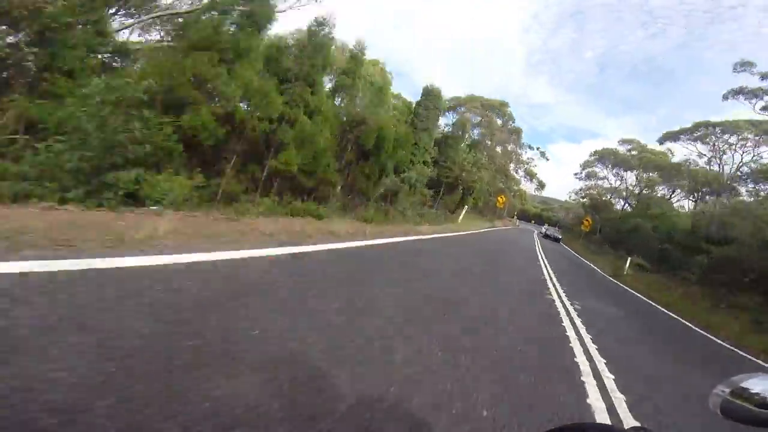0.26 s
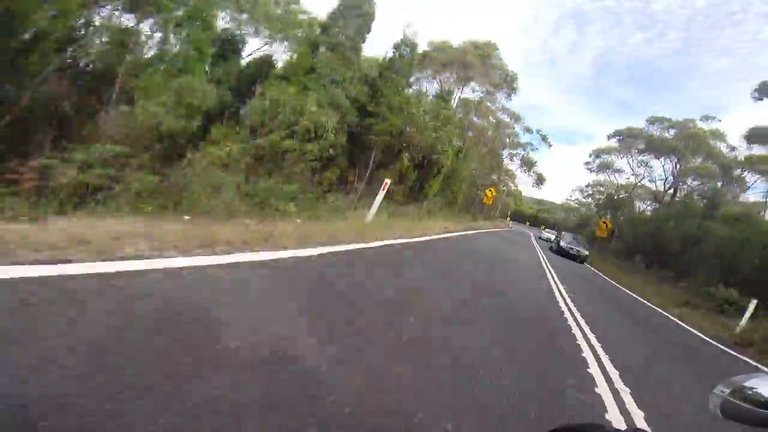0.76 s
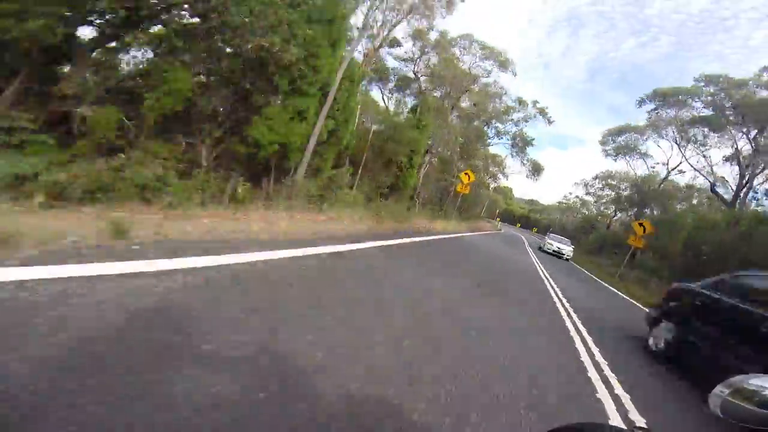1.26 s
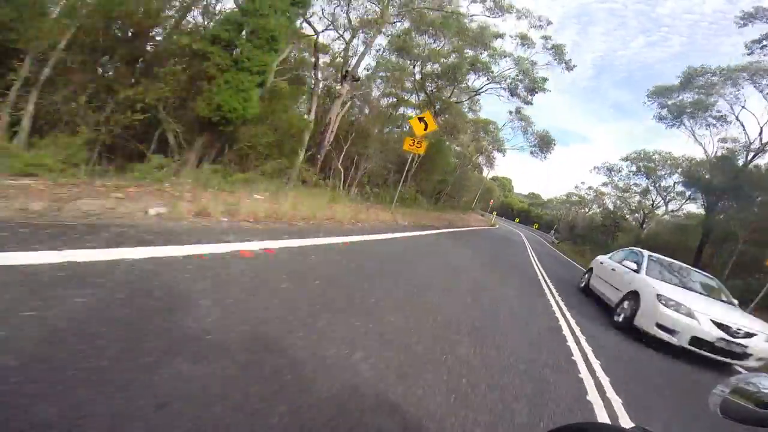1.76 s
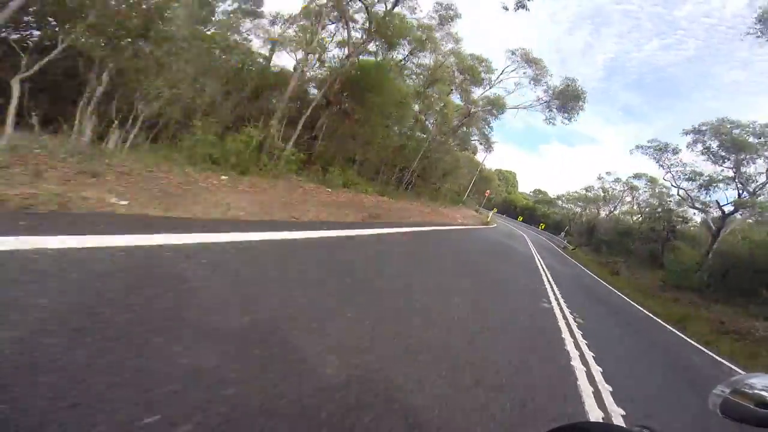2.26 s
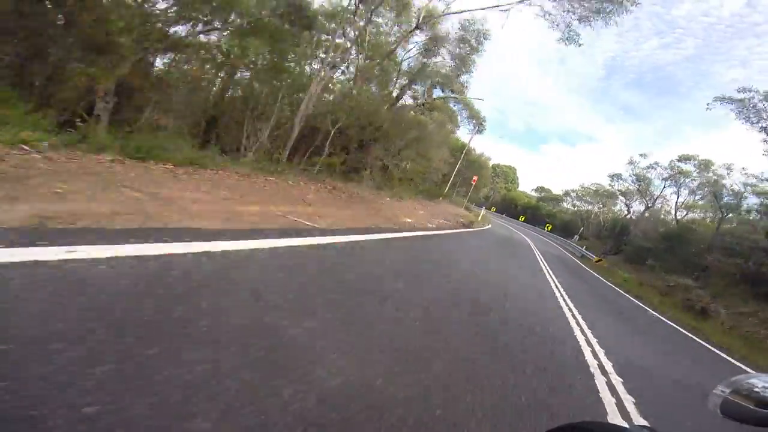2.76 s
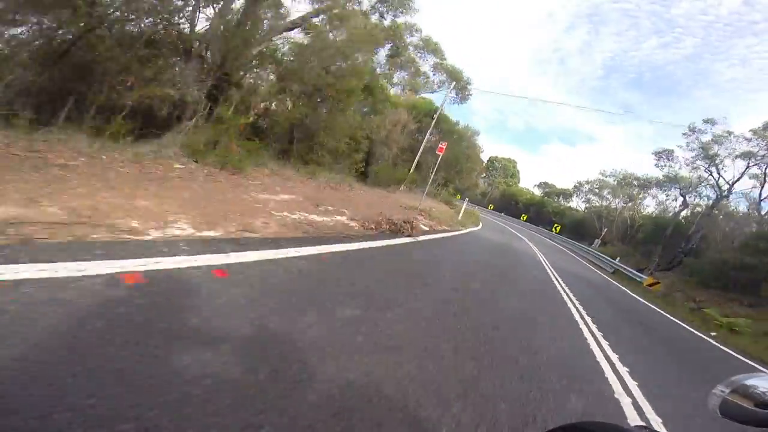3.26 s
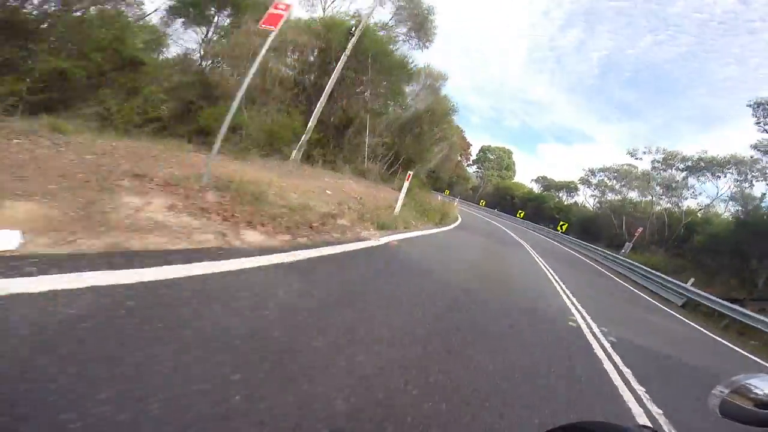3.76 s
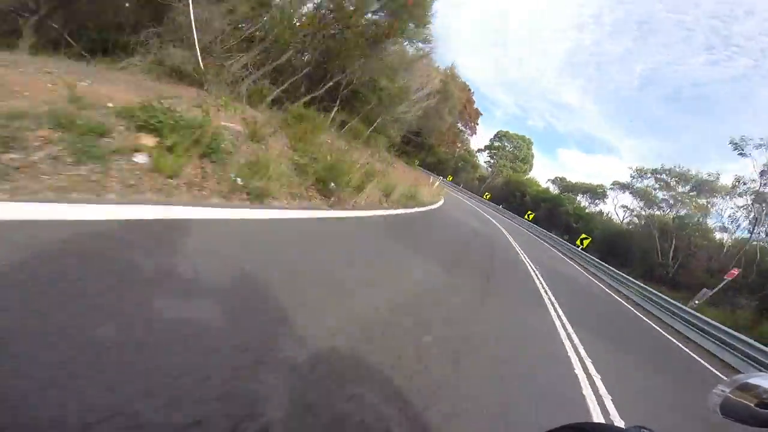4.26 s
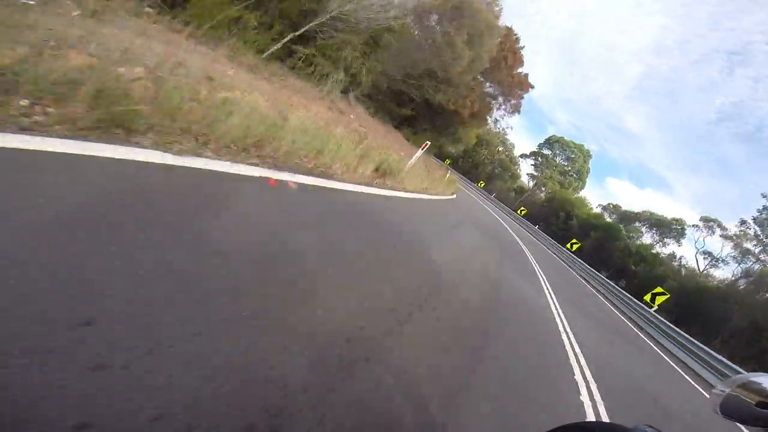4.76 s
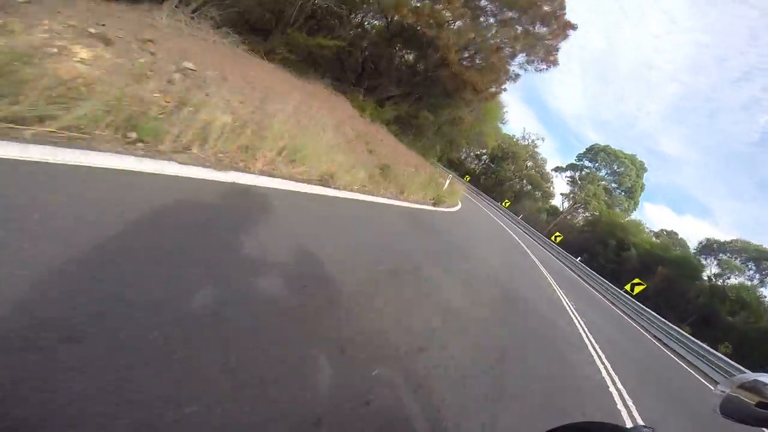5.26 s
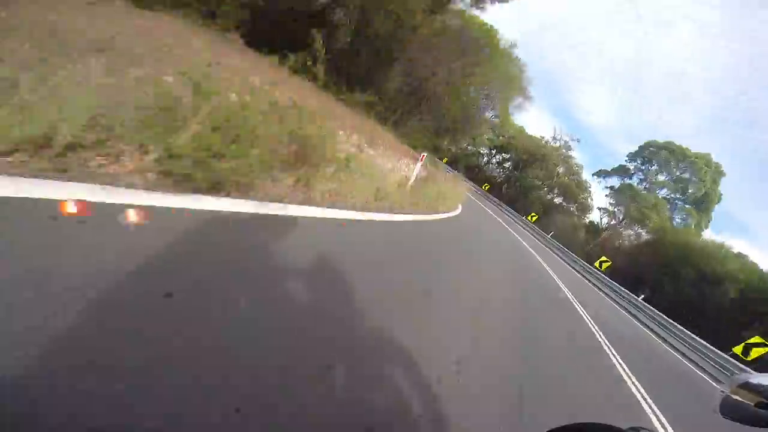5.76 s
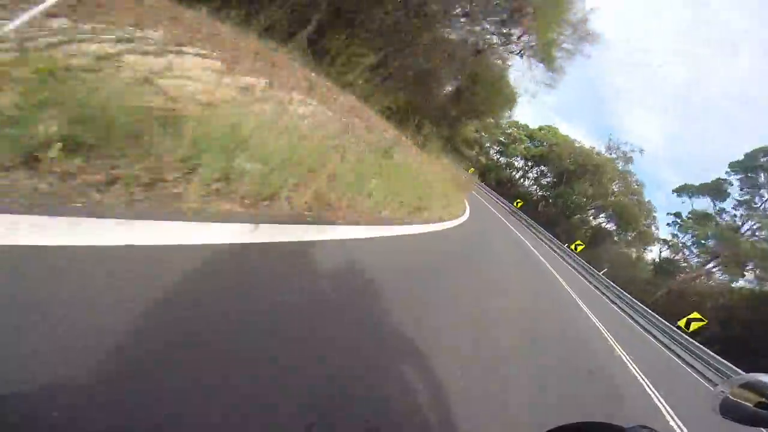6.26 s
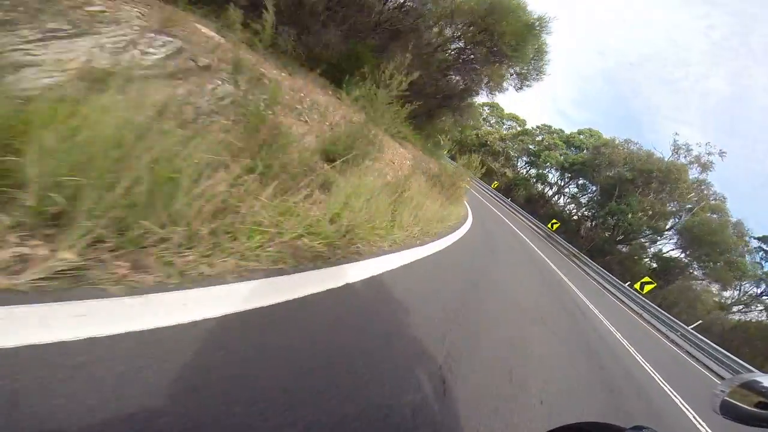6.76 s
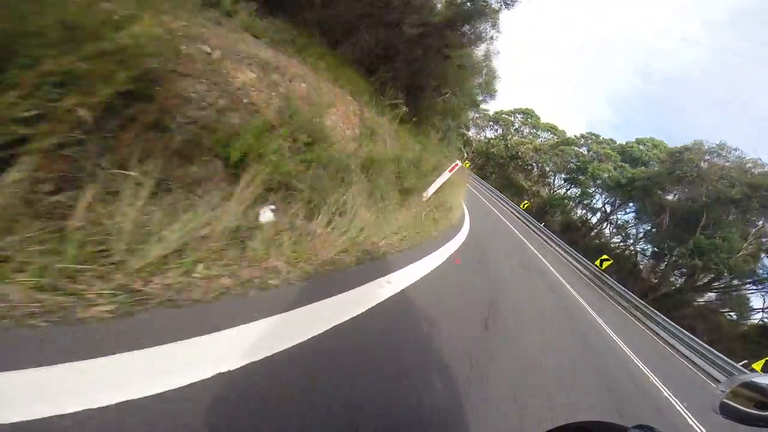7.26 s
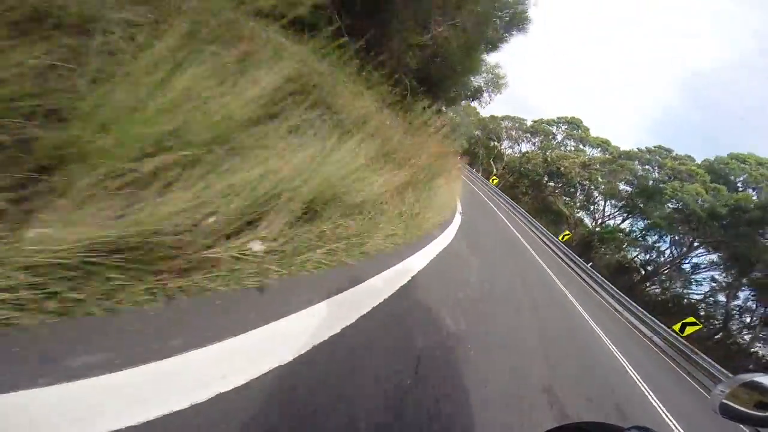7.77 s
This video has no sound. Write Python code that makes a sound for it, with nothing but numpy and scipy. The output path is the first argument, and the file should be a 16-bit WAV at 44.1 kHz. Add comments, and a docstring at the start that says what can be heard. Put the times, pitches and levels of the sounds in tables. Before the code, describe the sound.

From a camera mounted on a moving motorcycle comes a deep, uneven exhaust beat with light metallic clatter and gusty wind on the microphone. The engine pulls briefly, then slows for a bend as a gear whine slides downward. Small knocks from the road rattle the camera housing, mostly in the first half. The engine takes up load again at low revs, and the whine drops out and returns once more.

```python
"""A V-twin motorcycle on a country road, close up, from the microphone of a camera on the bike.
It pulls first: the exhaust beats over gear whine and valve clatter, wind rumbles round the microphone,
and road bumps and engine shake make the camera housing tick. At 1.5 s the rider rolls off into a bend;
the revs sink and the gearbox sings. From 5 s the throttle is open again and the bike holds low revs,
the gearbox dropping out and then singing once more."""
import sys
import numpy as np
from scipy import signal
from scipy.fft import rfft, irfft, next_fast_len
from scipy.io import wavfile

SR = 44100
rng = np.random.default_rng(int(sys.argv[2]) if len(sys.argv) > 2 else 0)


def generate_wav(sig):
    """Save sig (samples, or channels by samples) to the path in sys.argv[1] as 16-bit PCM at SR."""
    pcm = np.round(np.clip(np.atleast_2d(sig).T, -1, 1) * 32767).astype(np.int16)
    wavfile.write(sys.argv[1], SR, pcm)


N = 353152

# ringing of the engine cases: frequency_hz, gain_db
CASE_RING = [(400, -19), (600, -12), (710, 1.5), (830, -1.5), (950, -2), (1080, -11.5), (1230, -5.5),
             (1410, 0.5), (1580, 1.5), (1700, -15.5), (2100, -33.5), (3000, -58.5)]
# resonances that the gearbox tone slides through: frequency_hz, gain_db
GEARBOX_RESPONSE = [(798, -0.5), (816, -12.5), (850, -10.5), (915, -8), (945, -3), (975, -6), (1025, -18.5),
                    (1125, -8)]
# bright ringing of the camera housing: frequency_hz, width_hz, gain_db
HOUSING_MODES = [(2610, 680, 0.5), (3780, 440, -0.5), (4500, 530, -2), (6030, 620, -8), (6700, 610, -8),
                 (10600, 1700, -14.5)]


def from_db(db):
    """Decibels to gain."""
    return 10 ** (np.asarray(db) / 20)


def rms_one(x):
    """Scale to unit rms."""
    return x / np.sqrt(np.mean(x ** 2) + 1e-20)


def in_time(rows):
    """The columns of a curve at every sample."""
    time_s, *columns = np.transpose(rows)
    return [np.interp(np.arange(N) / SR, time_s, column) for column in columns]


def gain_at(spectrum, hz):
    """Read a dB spectrum on a log-frequency axis, as a gain."""
    points_hz, points_db = np.transpose(spectrum)
    return from_db(np.interp(np.log(hz + 1e-9), np.log(points_hz), points_db))


def colour(x, spectrum):
    """Give a steady sound a spectrum that ends at its last point; rms 1."""
    size = next_fast_len(N)
    hz = np.fft.rfftfreq(size, 1 / SR)
    gain = gain_at(spectrum, hz) * (hz < spectrum[-1][0])
    return rms_one(irfft(rfft(x, size) * gain, size)[:N])


def drift(rate, hop=40, settle=2000):
    """Smooth chance with about `rate` swings a second; spread 1."""
    pole = np.exp(-2 * np.pi * hop * rate / SR)
    noise = rng.standard_normal(N // hop + settle + 2)
    slow = signal.lfilter([1], [1, -2 * pole, pole * pole], noise)[settle:]
    return np.interp(np.arange(N) / hop, np.arange(len(slow)), rms_one(slow))


def resonate(x, hz, width_hz):
    """A two-pole resonance with gain 1 on top."""
    r = np.exp(-np.pi * width_hz / SR)
    feedback = [1, -2 * r * np.cos(2 * np.pi * hz / SR), r * r]
    return signal.lfilter(np.array([1, 0, -1]) * (1 - r * r) / 2, feedback, x + 1e-18)


def with_revs(cycle_hz, cruise_db, doubling_db, cruise_hz=30):
    """Gain of a noise that grows by doubling_db with each doubling of engine speed."""
    return from_db(cruise_db + doubling_db * np.log2(cycle_hz / cruise_hz))


def wind(cycle_hz, gust_db=3.5, buffet_hz=173.3):
    """Air round the microphone: a gusty rumble, and a narrow buffeting that fades as the bike slows."""
    # wind rumble: frequency_hz, level_db
    spectrum = [(15, -16), (35, -9), (48, -7.5), (74, 4.5), (98, -0.5), (130, -3), (190, -6.5),
                (220, -17.5), (300, -10), (400, -19), (520, -24), (640, -35.5), (1000, -70)]
    rumble = with_revs(cycle_hz, cruise_db=-26.5, doubling_db=9) * from_db(gust_db * drift(14))
    rumble *= colour(rng.standard_normal(N), spectrum)
    buffet = resonate(rng.standard_normal(N), buffet_hz, width_hz=30)
    buffet = rms_one(resonate(buffet, buffet_hz, width_hz=30))
    return rumble + with_revs(cycle_hz, cruise_db=-35, doubling_db=27) * buffet


def housing(clicks, modes, chatter, chatter_s, soft_hz=7000):
    """Soft contacts chatter and ring the camera housing; the peak equals the largest click."""
    fading = signal.lfilter([1], [1, -np.exp(-1 / (chatter_s * SR))], clicks + 1e-18)
    contact = clicks + chatter * fading * rng.standard_normal(N)
    contact = signal.sosfilt(signal.butter(2, soft_hz, fs=SR, output="sos"), contact)
    ring = sum((-1) ** k * from_db(db) * resonate(contact, hz, width_hz)
               for k, (hz, width_hz, db) in enumerate(modes))
    return ring * clicks.max() / np.abs(ring).max()


def housing_rattle(shake, slip_db=-11, slip_share=0.75, rebound_s=0.0027, rebound_db=-3.5):
    """The deepest swings of the shaking can make the housing slip with a faint double tick."""
    swing = -shake / from_db(slip_db)   # the housing holds until the swing passes 1
    troughs = signal.find_peaks(swing, height=1, distance=SR // 150)[0]
    depth = swing[troughs]
    luck, force, bounce = rng.random((N, 3))[troughs].T
    slips = luck < slip_share * (depth - 1)
    size = slips * from_db(-57 + 16 * force + 2 * depth)
    ticks = np.zeros(N)
    ticks[troughs] = size
    rebounds = np.minimum(troughs + int(rebound_s * SR), N - 1)
    ticks[rebounds] += size * from_db(rebound_db) * bounce ** 2
    return housing(ticks, HOUSING_MODES, chatter=0.26, chatter_s=0.00022)


def road_knocks(bright_db=3, dull_db=7.5):
    """Bumps in the road knock the housing, each with its own mix of dull and bright ringing."""
    # knocks, before the bright and dull gains: start_s, level_db, extra_dull_db
    bumps = [(0.0513, -42.5, 11), (0.087, -43, 6), (0.3309, -34.5, 8.5), (0.4299, -39, 10),
             (0.5501, -37, 10), (0.5751, -34, 8.5), (0.6878, -41, -3), (0.8729, -39, 12),
             (1.0301, -42.5, 10), (1.3028, -40.5, 5), (1.5404, -43.5, 13), (1.5913, -36, 7),
             (1.6426, -33.5, 8.5), (2.353, -39, -0.5), (2.5091, -30.5, 10), (2.5456, -40, 11),
             (2.6259, -39, 9.5), (2.6834, -43.5, 14), (2.725, -45, 15), (2.7671, -44, 2),
             (2.8898, -36.5, 7.5), (3.7925, -39.5, 11.5), (3.9792, -45, 12), (4.0419, -41, 6),
             (4.0716, -41, 10), (4.7561, -44.5, 8), (5.4796, -43, 0), (5.95, -44, 6), (6.8645, -40.5, -1),
             (7.6308, -41, -10)]
    # dull ringing of the housing: frequency_hz, width_hz, gain_db
    dull_modes = [(1740, 440, -2), (2270, 520, -5.5)]
    bright, dull = np.zeros(N), np.zeros(N)
    for start_s, level_db, extra_dull_db in bumps:
        bright[int(start_s * SR)] = from_db(level_db + bright_db)
        dull[int(start_s * SR)] = from_db(level_db + extra_dull_db + dull_db)
    bright_ring = housing(bright, HOUSING_MODES, chatter=0.47, chatter_s=0.0021, soft_hz=5500)
    return bright_ring + housing(dull, dull_modes, chatter=0.91, chatter_s=0.002)


def cam_drone(cycles, cycle_hz, flutter=0.24):
    """The cam drive hums on whole multiples of the crank speed, loudest where the cases ring."""
    # cam tones: multiple_of_cycle_rate, level_over_case_db
    tones = [(32, 1), (36, -0.5), (38, 0), (40, 0.5), (64, 0.5), (68, 0.5), (72, -1.5)]
    out = np.zeros(N)
    for order, db in tones:
        level = from_db(db) * gain_at(CASE_RING, order * cycle_hz) * (1 + flutter * drift(0.69))
        out += level * np.sin(2 * np.pi * (order * cycles + rng.random()))
    return np.sqrt(2) * out


def valve_train(cycles, repeat, bite, steps=1024):
    """Contacts bunch at set places in the cycle; the share `repeat` recurs exactly, the rest is chance."""
    orders = np.arange(steps // 2 + 1)
    pattern = irfft(np.exp(2j * np.pi * rng.random(len(orders))) * (orders > 13) * (orders < 100))
    locked = np.interp(cycles % 1 * steps, np.arange(steps), rms_one(pattern))
    locked *= np.sqrt(1 / 8)   # same power per Hz as the noise
    angle = 2 * np.pi * cycles
    bunching = np.exp(bite * (0.57 * np.cos(angle) + np.cos(2 * angle) + np.cos(3 * angle)))
    return bunching * (np.sqrt(repeat) * locked + np.sqrt(1 - repeat) * rng.standard_normal(N))


def engine_metal(cycles, cycle_hz, throttle, rasp_db=2.6, clatter_rasp_db=3, waver_db=1.16):
    """Valves and chains shake the cases: ring, drone, dry clatter and hiss rise with revs and load."""
    # dry valve clatter: frequency_hz, level_db
    clatter_spectrum = [(900, -29.5), (1700, 1.5), (1900, 1.5), (2250, -6), (2480, -7), (2620, -5.5),
                        (2760, -12), (2950, -19.5), (3600, -40)]
    # faint metallic hiss: frequency_hz, level_db
    hiss_spectrum = [(2000, -19), (3000, -6), (3350, -2), (3570, 2), (3950, -7), (4520, -1), (5400, -6),
                     (5950, -0.5), (6400, -10), (7100, -0.5), (7650, -18), (9650, -15), (10600, -33),
                     (15000, -57.5)]
    song = gearbox_song() * gain_at(GEARBOX_RESPONSE, GEARBOX_MESH * cycle_hz)
    rasp = (song / song.max()) ** 2   # a gearbox in resonance makes everything around it rasp
    ring = with_revs(cycle_hz, cruise_db=-36.5, doubling_db=9)
    ring *= colour(valve_train(cycles, repeat=0.2, bite=0.15), CASE_RING)
    drone = with_revs(cycle_hz, cruise_db=-47.5, doubling_db=4.4) * cam_drone(cycles, cycle_hz)
    clatter = with_revs(cycle_hz, cruise_db=-51.5, doubling_db=17.2) * from_db(clatter_rasp_db * rasp)
    clatter *= colour(valve_train(cycles, repeat=0.089, bite=0.21), clatter_spectrum)
    hiss = with_revs(cycle_hz, cruise_db=-66.5, doubling_db=9.5)
    hiss *= colour(valve_train(cycles, repeat=0, bite=0.14), hiss_spectrum)
    load = throttle - 0.5
    metal = from_db(load) * (ring + clatter) + from_db(1.5 * load) * drone + from_db(2.5 * load) * hiss
    return from_db(rasp_db * rasp + waver_db * drift(17)) * metal


def gearbox_song(attack_s=0.04, release_s=0.031):
    """Gain of the gearbox mesh: each stretch sets in quickly, holds and lets go."""
    # stretches in which the gearbox sings: start_s, end_s, gain_db
    stretches = [(1.64, 5.35, -31), (6.21, 7.64, -27)]
    t = np.arange(N) / SR
    return sum(from_db(db) * np.interp(t, [start, start + attack_s, end, end + release_s], [0, 1, 1, 0])
               for start, end, db in stretches)


def gear_whine(cycles, cycle_hz, flutter=0.17, crank_sway=0.047, wobble_rad=0.26, waver_db=0.76):
    """Gearbox and primary drive teeth whine, swayed by the crank and swelling at case resonances."""
    # resonances of the primary drive case: frequency_hz, gain_db
    primary_response = [(970, -20.5), (1005, -32), (1070, -19), (1130, -20), (1200, -11), (1260, -11.5),
                        (1290, -4.5), (1405, 0.5)]
    # how the cases radiate mesh overtones: frequency_hz, gain_db
    radiation = [(1600, -19.5), (1750, -34), (2000, -27.5), (2280, -25), (2400, -36), (2600, -30.5),
                 (2850, -48), (4300, -56.5), (4520, -39.5), (4750, -55.5), (6000, -62.5)]
    meshes = [(GEARBOX_MESH, gearbox_song(), GEARBOX_RESPONSE, 0),
              (PRIMARY_MESH, from_db(-27.5), primary_response, -9)]
    crank = 4 * np.pi * cycles   # two turns a cycle
    sway = crank_sway * (np.cos(crank) + np.cos(2 * crank))
    out = np.zeros(N)
    for teeth, gain, case, overtones_db in meshes:
        mesh_hz = teeth * cycle_hz
        phase = 2 * np.pi * teeth * cycles + wobble_rad * drift(25)
        level = gain * from_db(waver_db * drift(8.2)) * (1 + flutter * drift(23) + sway)
        tone = gain_at(case, mesh_hz) * np.sin(phase)
        overtones = sum(gain_at(radiation, k * mesh_hz) * np.sin(k * phase) for k in range(2, 6))
        out += level * (tone + from_db(overtones_db) * overtones)
    return np.sqrt(2) * out


def exhaust(cycles, cycle_hz, throttle, lift_db, second_at_cycle=0.42, second_size=0.7, flutter=0.14):
    """Two unevenly spaced firings a cycle; their orders slide through the pipe's resonances."""
    # engine orders: multiple_of_cycle_rate, throttle_shut_db, throttle_open_db
    orders = [(1, 19, 17), (2, 18, 14), (3, -9, 15), (4, 15.5, 11.5), (5, 1, 0.5), (6, 11, -1),
              (7, -8.5, -1), (8, 7.5, 3.5), (9, 3.5, -1.5), (10, -6, 3.0), (11, -3, 0), (12, 5.5, -12.5),
              (13, -0.3, 1), (14, 3, 1), (15, -9, -3.5), (16, -8, -1), (17, -2, 0.5), (18, -3, -4.5),
              (19, -14.5, -2), (20, -15.5, -0.5), (21, -3, -4)]
    # response of exhaust and frame: frequency_hz, gain_db
    pipe = [(30, -62), (58, -45.5), (66, -43), (70, -33.5), (82, -35), (100, -24.5), (118, -24.0),
            (150, -37.5), (175, -34), (215, -40.5), (270, -29), (315, -28.5), (380, -39.5), (520, -56.5),
            (620, -49.5), (705, -37.5), (800, -45.5)]
    bark_db = lift_db + 0.55 * drift(16)   # sharper and softer burns
    out = np.zeros(N)
    for order, shut_db, open_db in orders:
        bark_share = np.clip(order / 4 - 1, 0, 1)   # only above the fourth order
        level = from_db(shut_db + throttle * (open_db - shut_db) + bark_share * bark_db)
        level *= gain_at(pipe, order * cycle_hz) * (1 + flutter * drift(14))
        firings = 1 + second_size * np.exp(-2j * np.pi * order * second_at_cycle)
        lag_turns = 1.2 * np.log(order) ** 2   # the pipe smears each pulse
        out -= level * np.cos(2 * np.pi * (order * cycles - lag_turns) + np.angle(firings))
    return np.sqrt(2) * out * (1 + flutter * drift(30))   # no two burns are alike


def scene():
    """The ride at the microphone; everything on the engine is locked to one crank."""
    # engine speed in four-stroke cycles: time_s, cycle_hz
    revs = [(0.0, 39.12), (0.5, 39.33), (0.62, 40.03), (1.3, 41.48), (1.53, 40.59), (1.62, 37.74),
            (1.7, 39.88), (1.85, 40.36), (2.0, 39.5), (2.3, 38.99), (2.5, 37.61), (3.5, 33.66),
            (3.75, 33.06), (4.0, 31.61), (4.5, 30.52), (5.0, 29.64), (6.0, 29.86), (6.25, 29.42),
            (6.5, 29.65), (7.0, 28.72), (7.5, 28.37), (8.0, 29.03)]
    # the rider's throttle and the lift of the higher orders: time_s, opening_0_to_1, lift_db
    twist_grip = [(0.0, 0.63, 2.5), (0.55, 0.74, 3), (0.75, 0.84, -5.5), (1.4, 0.85, -2.5), (1.6, 0.3, 1.7),
                  (2.0, 0.28, 2.5), (2.6, 0.13, 1.5), (3.4, 0.0, -1), (4.2, 0.0, -4), (5.1, 0.5, 0.2),
                  (6.0, 0.72, -2.5), (6.5, 0.49, -0.9), (7.1, 0.8, 0.74)]
    cycle_hz, = in_time(revs)
    throttle, lift_db = in_time(twist_grip)
    cycles = np.cumsum(cycle_hz) / SR
    shake = exhaust(cycles, cycle_hz, throttle, lift_db) + wind(cycle_hz)
    machinery = gear_whine(cycles, cycle_hz) + engine_metal(cycles, cycle_hz, throttle)
    return (shake + machinery + road_knocks() + housing_rattle(shake))[None]


def record(dry, cutoff_hz=15700):
    """The camera's single channel, with the top treble cut steeply."""
    return signal.sosfilt(signal.cheby2(12, 70, cutoff_hz, fs=SR, output="sos"), dry)


GEARBOX_MESH, PRIMARY_MESH = 28.15, 34   # tooth contacts per engine cycle

dry = scene()
out = record(dry)
generate_wav(out)
```